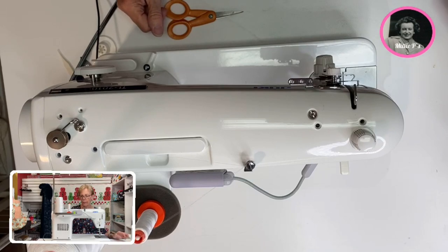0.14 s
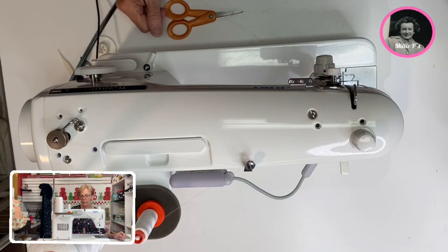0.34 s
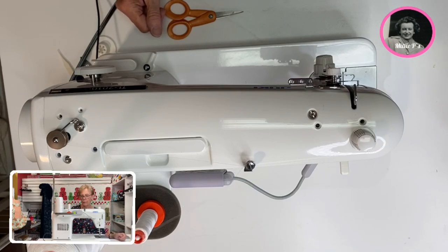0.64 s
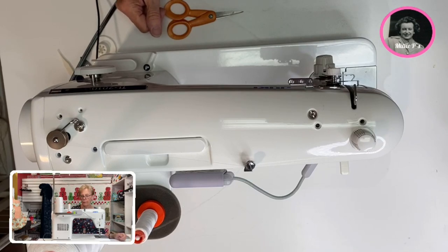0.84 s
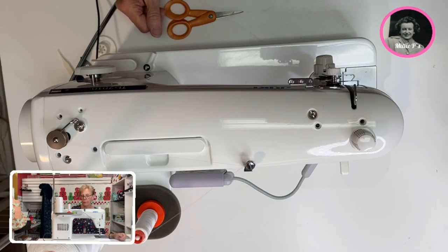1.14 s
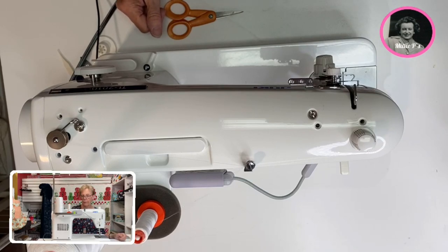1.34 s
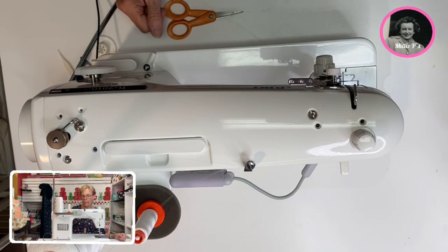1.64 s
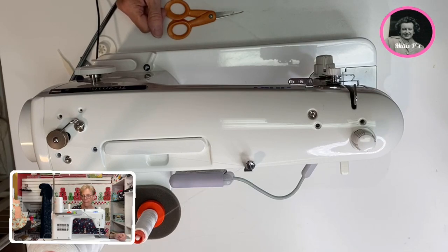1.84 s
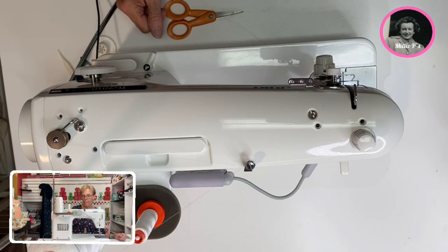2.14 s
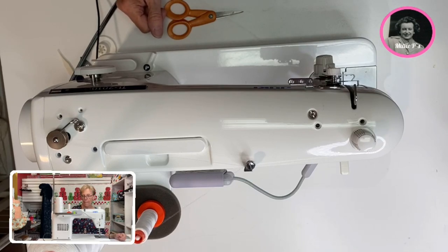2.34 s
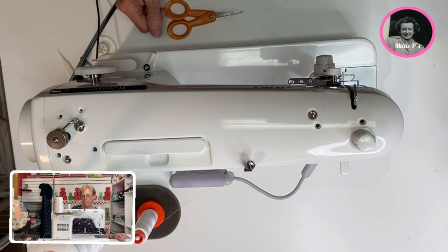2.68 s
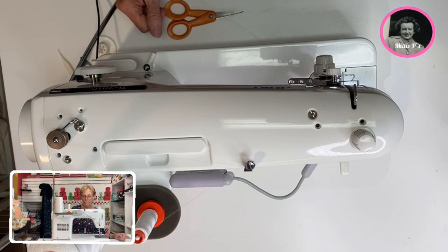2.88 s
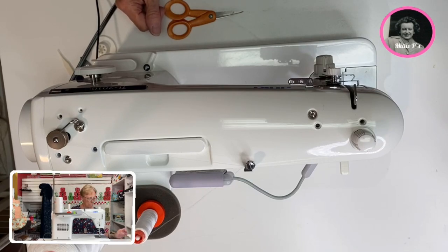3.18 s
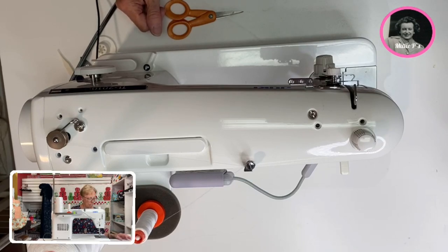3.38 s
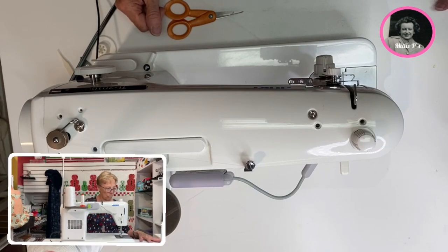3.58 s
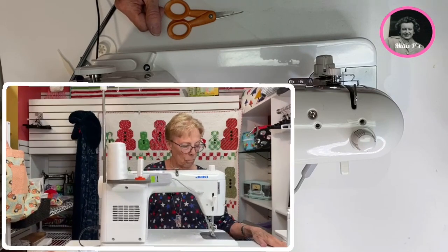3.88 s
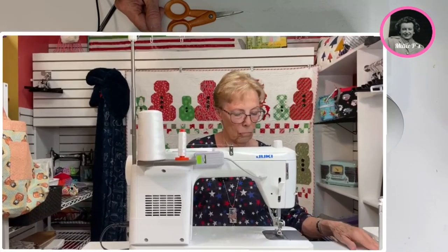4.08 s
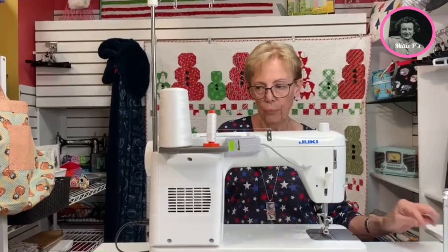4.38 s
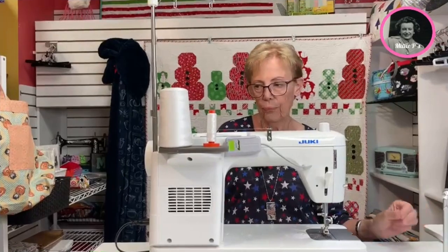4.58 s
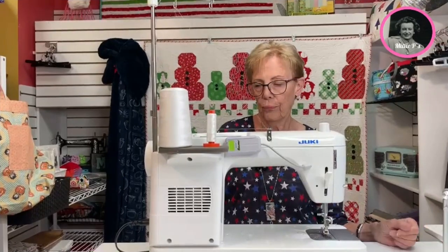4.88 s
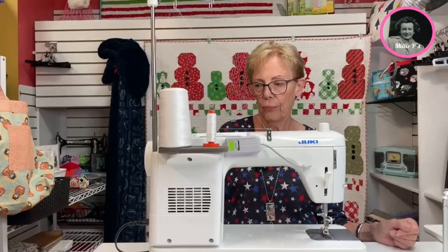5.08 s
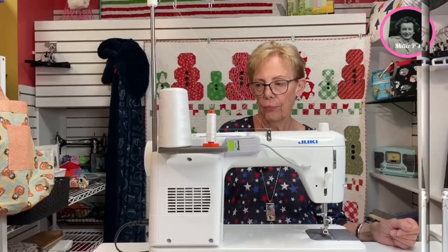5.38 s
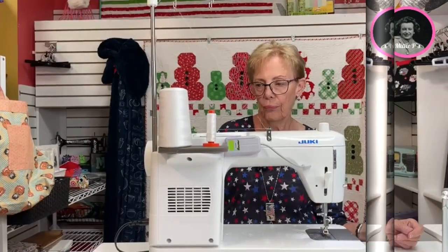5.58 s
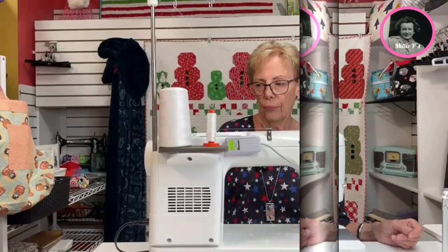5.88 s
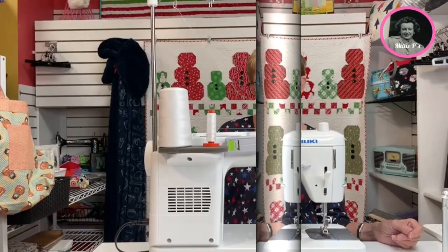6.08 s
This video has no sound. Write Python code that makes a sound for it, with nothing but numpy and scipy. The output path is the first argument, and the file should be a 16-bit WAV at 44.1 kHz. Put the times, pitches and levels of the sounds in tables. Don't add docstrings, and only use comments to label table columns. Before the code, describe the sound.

Close, continuous bobbin winding: a piercing, slightly rough electric whine over a rapid ticking buzz, rubbery rumble and faint thread hiss.

```python
import sys
import numpy as np
from scipy import signal
from scipy.fft import rfft, irfft
from scipy.io import wavfile

SR = 44100
rng = np.random.default_rng(int(sys.argv[2]) if len(sys.argv) > 2 else 0)


def volts_from_decibels(level):
    exponent = np.asarray(level, float) / 20
    return 10 ** exponent


def dump_mix(stems):
    frames = np.atleast_2d(stems).T
    limited = np.clip(frames, -1, 1)
    pcm = np.round(limited * 32767).astype(np.int16)
    wavfile.write(sys.argv[1], SR, pcm)


N = 274346
T = np.arange(N) / SR


def evened(x):
    return x / np.sqrt(np.mean(x ** 2) + 1e-20)


def column(rows, k):
    rows = np.array(rows)
    return np.interp(T, rows[:, 0], rows[:, k])


def spells(rows):
    return sum(size * np.exp(-((T - middle) / (0.78 * length)) ** 2) for middle, length, size in rows)


def shaped(points):
    hz, db = np.transpose(points)
    f = np.fft.rfftfreq(N, 1 / SR)
    gain = volts_from_decibels(np.interp(np.log(f + 1), np.log(hz + 1), db))
    return evened(irfft(rfft(rng.standard_normal(N)) * gain, N))


def drift(hz):
    f = np.fft.rfftfreq(N, 1 / SR)
    gain = (f > 0) / (1 + (f / hz) ** 4)
    return evened(irfft(rfft(rng.standard_normal(N)) * gain, N))


def resonate(x, hz, width):
    b, a = signal.iirpeak(hz, hz / (1.47 * width), SR)
    return evened(signal.lfilter(b, a, signal.lfilter(b, a, x)))


def struck(clicks, modes):
    return evened(sum(volts_from_decibels(db) * resonate(clicks, hz, width) for hz, width, db in modes))


def rubbed(turns, modes, count, drift_db, drift_hz):
    out = np.zeros(N)
    for hz, width, db, swell_db, place in modes:
        each_turn_db = swell_db * np.cos(2 * np.pi * count * (turns - place))
        swell = volts_from_decibels(each_turn_db + drift_db * drift(drift_hz))
        out += volts_from_decibels(db) * resonate(swell * rng.standard_normal(N), hz, width)
    return out


def whine_swell_db():
    # (time [s], level [dB])
    whine_level = [(0, -35), (.5, -34.5), (2.2, -33.5), (2.8, -33.5), (3.5, -34.5), (4.4, -34.5),
                   (5.0, -33.5), (5.75, -34.5), (6.22, -40.5)]
    return column(whine_level, 1) + 34


def body_level():
    return -44.5 + 0.23 * whine_swell_db()


def looseness():
    # (middle [s], length [s], looseness [0-1])
    loose_spells = [
        (1.3, .3, 0),
        (2.5, .3, 0),
        (3.3, 0.42, 0.9),
        (3.65, 0.71, 0.27),
        (4.0, 0.49, 0.87),
        (5.0, .4, 0),
        (5.9, 0.88, 0.15),
    ]
    return spells(loose_spells)


def table_shake():
    # (frequency [Hz], level [dB per Hz])
    shake_spectrum = [(3, -3), (8, -2), (25, 3), (33, -8), (55, -6.5), (75, -16.5), (110, -38), (200, -66)]
    return volts_from_decibels(-38.5) * shaped(shake_spectrum)


def distant_fan():
    fan_hz = 59.3
    fan_db = -51.5 + spells([(4.7, 1.3, 8)]) + 3.0 * drift(0.78)
    return volts_from_decibels(fan_db) * np.sqrt(2) * np.sin(2 * np.pi * fan_hz * T)


def thread_hiss(turns):
    # (frequency [Hz], width [Hz], level [dB], swell each turn [dB], place of the swell [turns])
    hiss_modes = [(7520, 280, 0, 2, 0), (11200, 400, -5, 6, 1), (11960, 320, 0.5, -0.5, 1),
                  (12700, 180, -5, 1, .9), (12900, 370, -13, 0, .9), (13600, 500, -3, 4, .9),
                  (15100, 500, -7, 2, .9)]
    # (middle [s], length [s], gain [dB])
    taut_spells = [
        (.9, 1.0, 1),
        (3.0, 0.66, 3.5),
        (3.9, .9, 6),
    ]
    hiss_db = body_level() - 25 + spells(taut_spells)
    return volts_from_decibels(hiss_db) * rubbed(turns, hiss_modes, count=1, drift_db=2.0, drift_hz=0.9)


def steel_post(turns):
    # (frequency [Hz], width [Hz], level [dB], swell [dB], place of the swell [turns])
    post_modes = [(8520, 18, -4, 3, 0), (9200, 43, -6, -2, 0.4), (9280, 70, 1, 0, 0),
                  (10250, 49, -5.5, 9, 0.25)]
    # (middle [s], length [s], drag [0-1])
    drag_spells = [
        (.3, 0.28, 0.96),
        (.75, 0.35, 0.9),
        (1.6, .8, .4),
        (2.8, 0.36, 0.35),
        (4.95, .3, 0.6),
        (5.6, 0.36, 0),
    ]
    post_db = -67.5 + 7 * looseness() + 6 * spells(drag_spells)
    return volts_from_decibels(post_db) * rubbed(turns, post_modes, count=2, drift_db=2.0, drift_hz=1)


def tyre_rumble(turns):
    # (frequency [Hz], width [Hz], level [dB], swell each turn [dB], place of the swell [turns])
    housing_modes = [(216.5, 61, -6.5, 1, 0.18), (339.4, 39, -15, -3, 0.2), (550, 120, -33.5, -1, 0.13),
                     (992, 50, -8.5, 4.5, 0.47), (1229, 50, -4, 11, 0.16), (1457, 58, -10, 6, 0.13),
                     (2010, 950, -18.5, 23, 0.13), (2160, 146, -9.5, -8, 0.5), (2568, 22, -20, 12, 0),
                     (2880, 81, -13, 0, 0.29), (3437, 87, -8.5, -2.5, 0), (3823, 330, -12.5, 0, 0.14)]
    # (frequency [Hz], width [Hz], level [dB], swell [dB], place [turns])
    collar_modes = [(4750, 460, -19, 1.9, 0), (5480, 150, -14, 4.2, 0)]
    # (frequency [Hz], level [dB per Hz])
    wash_spectrum = [(41, -39), (70, -12.5), (148, -16.5), (189, -23.5), (478, -20.5), (560, -13.5),
                     (786, -17.5), (1240, -10), (1350, -41), (1620, -10.5), (1860, -7.5), (2330, -18),
                     (3820, -11.5), (4380, -23), (15500, -40.5)]
    body_db = body_level()
    collar_db = body_db + 2.5 - 14.5 * looseness()
    housing = volts_from_decibels(body_db + 0.5) * rubbed(turns, housing_modes, count=1, drift_db=0.08, drift_hz=3.8)
    collar = volts_from_decibels(collar_db) * rubbed(turns, collar_modes, count=1, drift_db=0.7, drift_hz=2.4)
    wash = volts_from_decibels(body_db + 3.0 + 1.33 * drift(42)) * shaped(wash_spectrum)
    return housing + collar + wash


def bobbin_hum(turns):
    # (multiple of the bobbin speed, level [dB rms])
    bobbin_orders = [(5, -56.5), (6, -70.5), (8, -69)]
    return sum(volts_from_decibels(db) * np.sqrt(2) * np.cos(2 * np.pi * k * turns) for k, db in bobbin_orders)


def spindle(turns):
    # (place [turns], tick [dB], rattle [dB])
    bumps = [
        (0, -4.5, -3),
        (0.646, -10, -9),
        (0.792, -9, -7),
    ]
    # (frequency [Hz], width [Hz], level [dB])
    tick_modes = [(1510, 170, 5), (2894, 120, 8), (3403, 180, 6), (4960, 1060, 2.5), (6620, 330, 1),
                  (8560, 290, -8.5), (10250, 130, -20), (12500, 2200, -6)]
    # (frequency [Hz], width [Hz], level [dB])
    rattle_modes = [(6500, 600, -7), (7300, 700, -3.5), (8180, 700, 0), (12500, 300, -15)]
    # (frequency [Hz], width [Hz], level [dB])
    knock_modes = [(979, 77, -8), (1239, 107, -2)]
    tick, rattle, knock = np.zeros((3, N))
    for place, tick_db, rattle_db in bumps:
        at = np.flatnonzero(np.diff(np.floor(turns - place)) > 0)
        luck = rng.standard_normal((len(at), 2))
        at = np.clip(at + (14.0 * luck[:, 0]).astype(int) - 20, 0, N - 1)
        tick[at] += volts_from_decibels(tick_db + 1.24 * luck[:, 1])
        rattle[at] += volts_from_decibels(rattle_db + 1.5 * luck[:, 1])
        knock[at] += volts_from_decibels(3.7 * (tick_db + luck[:, 1]))
    burst = np.exp(-np.arange(300) / 23.0)
    tick = signal.oaconvolve(tick, burst)[:N] * rng.standard_normal(N)
    rattle = signal.oaconvolve(rattle, burst)[:N] * rng.standard_normal(N)
    loose = looseness()
    reseat_db = spells([(4.72, 0.4, 4.5)])
    out = volts_from_decibels(-48 - 2.5 * loose + reseat_db) * struck(tick, tick_modes)
    out += volts_from_decibels(-69 + 14.7 * loose) * struck(rattle, rattle_modes)
    return out + volts_from_decibels(body_level() - 5.0) * struck(knock, knock_modes)


def winder():
    turn_hz = 45.85
    # (time [s], lag [ms])
    slip = [(0, 4.6), (1.55, 0), (3.5, -3.8), (4.4, -2), (6.22, 6.6)]
    turns = (T - column(slip, 1) / 1000) * turn_hz
    return thread_hiss(turns) + steel_post(turns) + tyre_rumble(turns) + bobbin_hum(turns) + spindle(turns)


def shaft_turning():
    overshoot_hz = 16.97 * np.exp(-T / 0.1396)
    whine_hz = 1874.9 + overshoot_hz + 0.7 * drift(5)
    return np.cumsum(whine_hz / 78) / SR


def drive_train():
    # (multiple of the motor speed, level [dB rms])
    motor_orders = [(1, -42.7), (3, -56.9), (4, -61.5), (5, -61.5), (6, -69.4), (7, -59.1), (10, -60.9),
                    (11, -59.1), (12, -50.2), (13, -31.1), (14, -48.3), (15, -49.4), (16, -67.7),
                    (17, -68.0), (18, -61.0), (19, -63.6), (21, -72.3), (22, -70.0), (23, -65.3),
                    (24, -63.0), (25, -63.5), (26, -51.7), (27, -54.2), (28, -58.4), (29, -65.7),
                    (33, -72.5), (36, -77.0), (38, -66.2), (39, -64.3), (40, -77.8)]
    # (multiple of the shaft speed, level [dB rms])
    shaft_orders = [(5, -64.0), (8, -62.3), (10, -56.4), (11, -67.3), (15, -67.0), (17, -73.9), (19, -75.1),
                    (20, -70.9), (21, -65.9), (23, -56.0), (25, -65.0), (28, -65.1), (37, -68.9),
                    (59, -62.4), (68, -62.1), (69, -64.9), (70, -67.9), (77, -50.5), (79, -52.5),
                    (81, -60.5), (83, -58.9), (85, -56.8), (88, -58.9), (151, -61.0), (155, -58),
                    (157, -68), (158, -62.8), (161, -61.7), (163, -62.2), (179, -74.9),
                    (41, -65), (61, -67), (62, -64), (64, -68), (71, -64), (73, -60), (74, -63), (75, -62),
                    (76, -66), (80, -64), (82, -70), (86, -65), (116, -68), (119, -67), (152, -65),
                    (153, -66), (164, -69), (169, -67), (227, -71), (229, -74)]
    # (multiple of the shaft speed, plus multiple of the belt speed, level [dB rms])
    belt_orders = [(33, -7, -66), (72, 2, -66), (77, -1, -66), (77, 1, -66), (77, 3, -65), (78, -9, -61),
                   (78, -8, -60), (78, -6, -56), (78, -4, -60), (78, -3, -50), (78, -2, -58), (78, 2, -57),
                   (78, 3, -54), (78, 8, -60), (79, -3, -63), (79, -1, -65), (79, 1, -64), (84, -2, -60),
                   (84, -1, -63), (84, 3, -65), (84, 6, -62), (85, 1, -63), (89, -2, -66), (90, 1, -65)]
    # (multiple of shaft, plus multiple of belt, level [dB rms])
    belt_high_orders = [(149, -2, -70), (150, -3, -70), (150, -2, -69), (150, -1, -69), (150, 1, -66),
                        (155, -2, -66), (155, -1, -70), (155, 1, -66), (156, -4, -67), (156, -3, -63),
                        (156, -2, -60), (156, -1, -62), (156, 1, -62), (156, 2, -63), (156, 3, -62),
                        (156, 4, -69), (156, 6, -67), (156, 8, -67), (156, 9, -68), (157, -1, -69),
                        (157, 1, -66), (158, -2, -70), (161, -2, -65), (162, -2, -65), (162, -1, -66),
                        (162, 1, -67), (162, 3, -66), (162, 6, -68), (168, -1, -70), (234, -3, -69)]
    belt_per_shaft = 0.7156
    seam_place, shaft_place, rotor_place = 0.045, -0.28, 0.22
    seam_lead, rotor_lead = (0.2, 0.52), (0.61, 0.27)

    lines = [(6 * k, 0, db) for k, db in motor_orders]
    lines += [(k, 0, db) for k, db in shaft_orders]
    lines += [(k, b, db - 1.2 * np.sign(b)) for k, b, db in belt_orders]
    lines += [(k, b, db - 0.5) for k, b, db in belt_high_orders]

    shaft_turns = shaft_turning()
    swell_db = whine_swell_db()
    start = rng.random(200)
    out = np.zeros(N)
    for k, b, db in lines:
        order = k + belt_per_shaft * b
        harmonic = round(k / 78)
        off, odd = k - 78 * harmonic, harmonic % 2
        if off == 0:
            lead = 0
        elif off % 6 == 0:
            lead = rotor_lead[odd] - rotor_place * off / 6
        elif abs(off) == 1:
            lead = -shaft_place * off
        else:
            lead = start[abs(off)] * np.sign(off) + 0.13
        if b != 0:
            lead += seam_lead[odd] - seam_place * b * (1 - odd)
        closeness = np.exp(-((order - 78 * harmonic) / 2.9) ** 2) * (order > 39)
        follow = 0.37 + 0.94 * closeness
        tone = np.sqrt(2) * np.cos(2 * np.pi * (order * shaft_turns + lead))
        out += volts_from_decibels(db + follow * swell_db) * tone
    return out * volts_from_decibels(0.14 + 0.12 * drift(16))


def scene():
    return (table_shake() + distant_fan() + winder() + drive_train())[None]


def band_limit(x):
    return signal.sosfilt(signal.butter(12, 15680, fs=SR, output="sos"), x)


def record(dry):
    # (time [s], length [s], depth [dB], lost above [Hz])
    losses = [(.085, .012, 8, 6000), (2.103, 0.016, 15, 5500), (3.704, .012, 2, 8020),
              (5.493, .018, 14, 3200), (5.934, 0.02, 13, 5000), (6.192, 0.012, 16, 4000)]
    out = dry
    for middle, length, depth_db, corner_hz in losses:
        high_pass = signal.butter(3, corner_hz, "high", fs=SR, output="sos")
        treble = signal.sosfiltfilt(high_pass, out)
        dip_db = -depth_db * np.exp(-((T - middle) / (0.66 * length)) ** 2)
        out = out - treble * (1 - volts_from_decibels(dip_db))
    return band_limit(out)


dry = scene()
out = record(dry)
dump_mix(out)
```